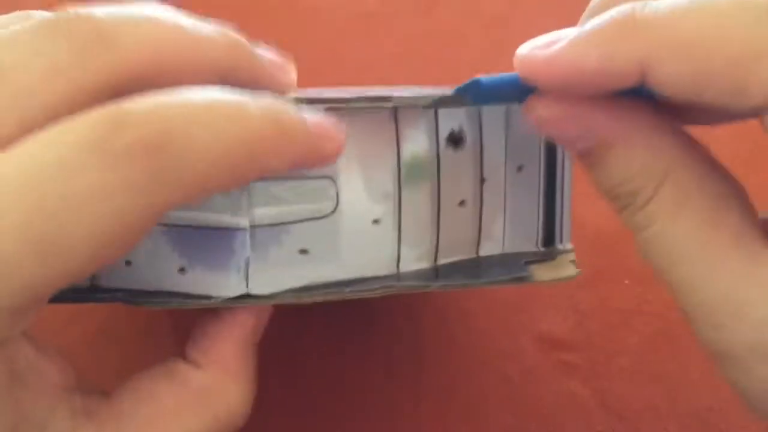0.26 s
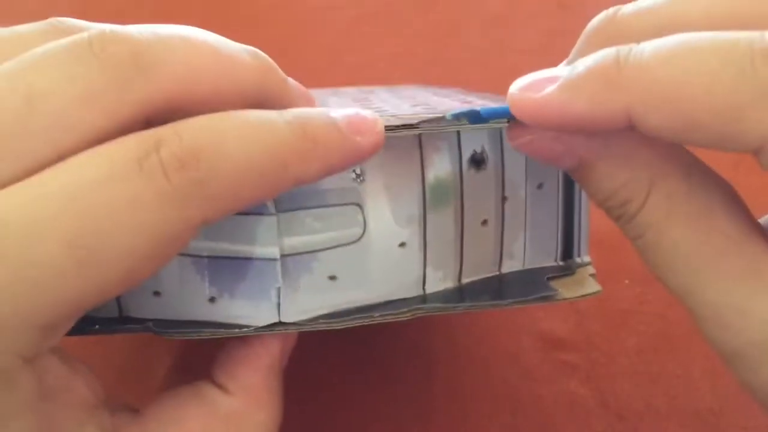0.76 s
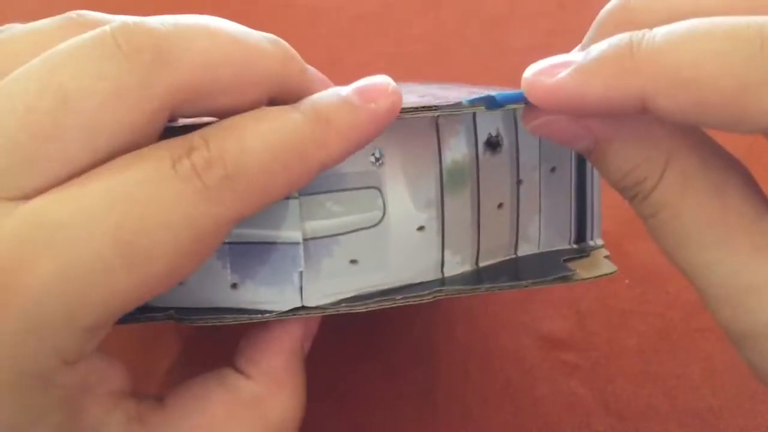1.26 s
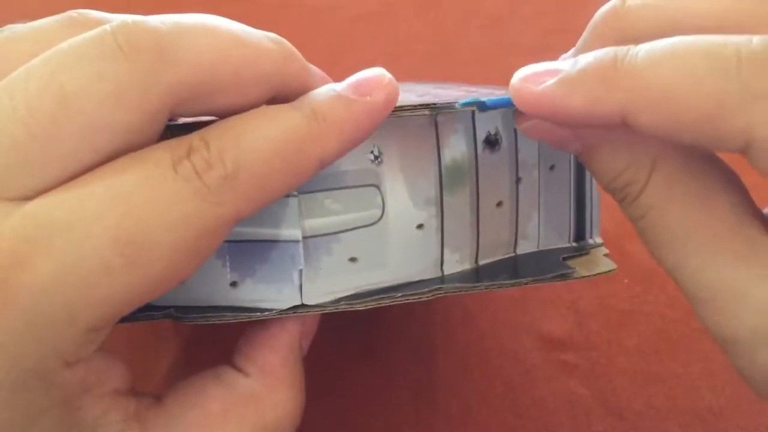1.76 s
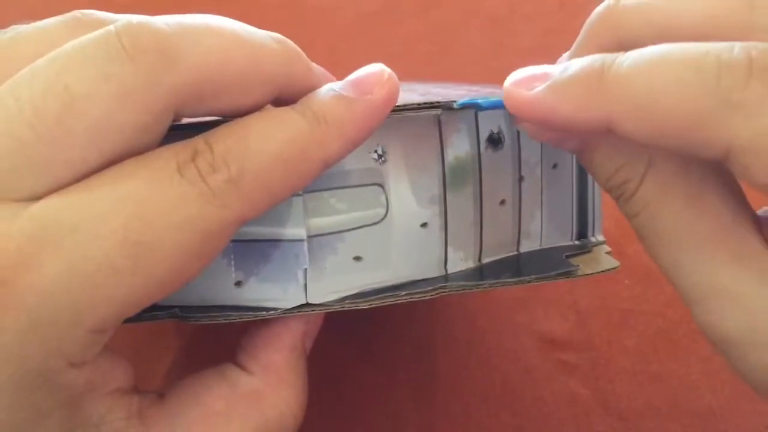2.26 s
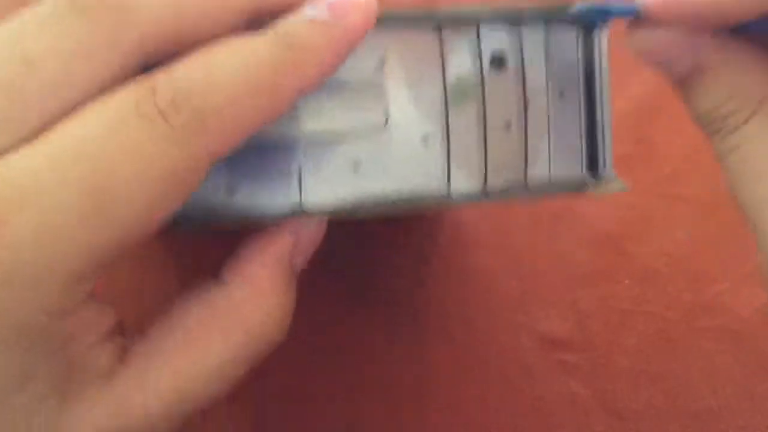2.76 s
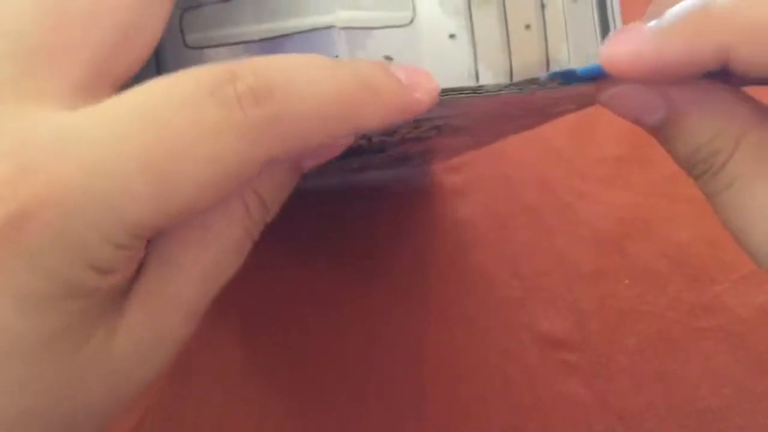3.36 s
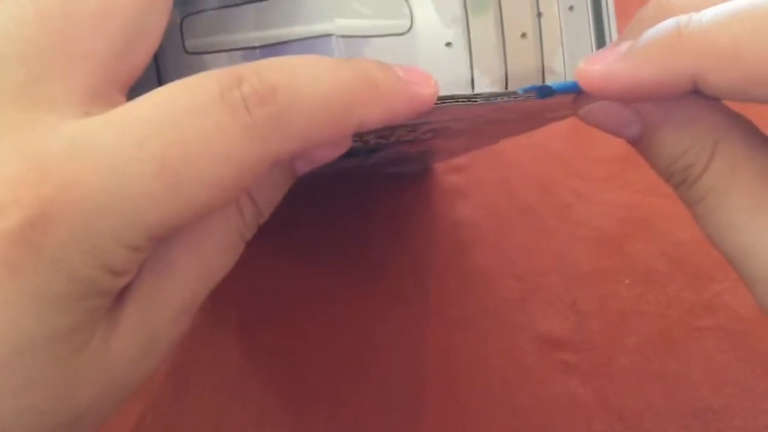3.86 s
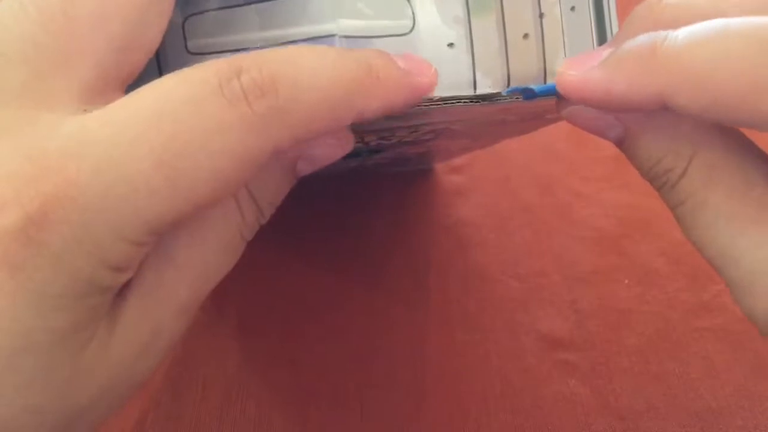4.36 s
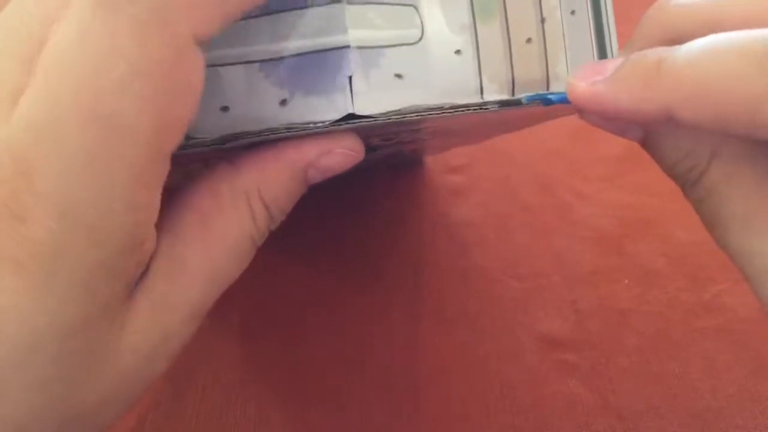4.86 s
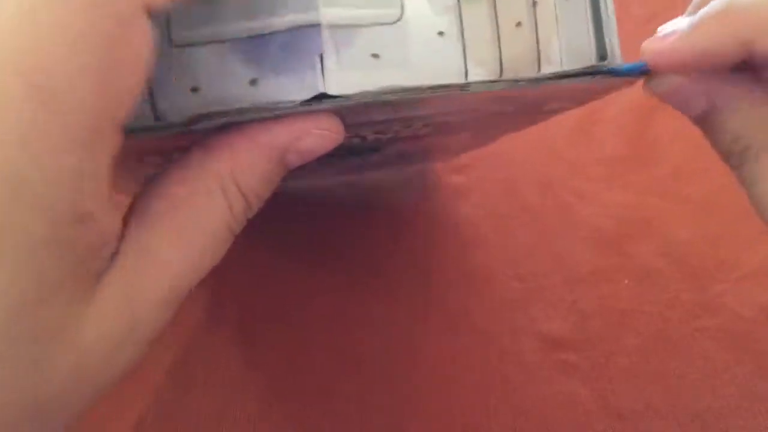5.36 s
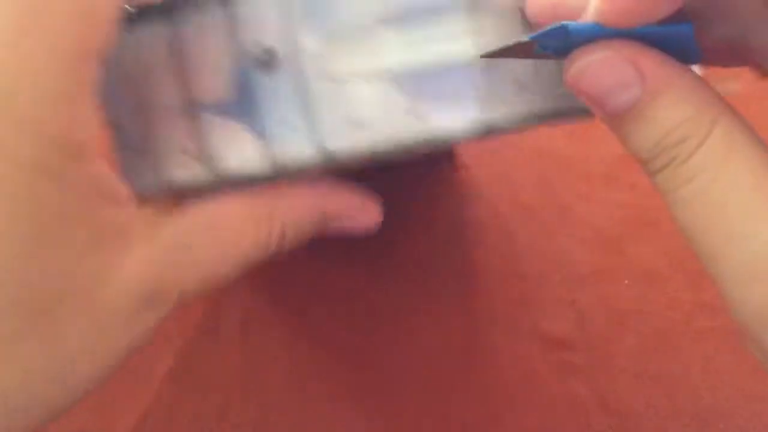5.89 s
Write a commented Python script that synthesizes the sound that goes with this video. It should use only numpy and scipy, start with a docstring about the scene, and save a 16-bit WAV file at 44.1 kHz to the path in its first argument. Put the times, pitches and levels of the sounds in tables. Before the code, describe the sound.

A low, steady appliance hum fills a room throughout. At the start, fingers brush softly on a small cardboard box, very close. Fingernails and a craft knife pick at its tape, giving light crackles and small hollow pops around 0.5 seconds, then again at 1.8 and 2.2 seconds. A sharper snap comes at about 2.5 seconds, followed by a soft slide of fingers and another crackle. Faint, scattered ticks continue from 3 to 5 seconds, with a brief scrape near 4.6. At 5.1 seconds the tape gives with a crisp crackle and pop, followed by rubbing and faint blade squeaks. The loudest snap, with a hollow cardboard pop, lands at about 5.5 seconds. Soft sliding and a few light taps on the box follow around 6 seconds. Each sharp sound has a short, bright room echo.

```python
"""First comes a soft brush of fingers on a small cardboard box, very close by. Then fingernails and a
craft knife pick at its packing tape. Each time the tape gives, threads of glue snap with a crackle and
the cardboard panel springs back with a hollow pop. In between, fingers slide and the blade squeaks.
The ceiling answers with a bright echo, the room rings briefly, and an appliance hums throughout."""
import sys
import numpy as np
from scipy import signal
from scipy.fft import rfft, irfft, next_fast_len
from scipy.io import wavfile
from scipy.ndimage import map_coordinates

SR = 44100
rng = np.random.default_rng(int(sys.argv[2]) if len(sys.argv) > 2 else 0)


def wav_out(sig):
    """Save sig, one row per channel (or a flat mono array), as 16-bit PCM at SR to the path in sys.argv[1]."""
    wavfile.write(sys.argv[1], SR, np.round(np.clip(np.atleast_2d(sig).T, -1, 1) * 32767).astype(np.int16))


N = 270333

# The tape gives and the panel springs back: (time [s], crackle level [dB], tearing time [s],
# treble tilt [dB per octave], tape ring pitch [Hz], pop level [dB], panel swing rate [Hz])
TAPE_TEARS = [(.422, -47, 0.0028, 4.5, 3020, -50.5, 820), (.622, -48.5, 0.0062, -1.5, 3350, -41, 524),
              (1.848, -37, 0.0042, 0, 6260, -40.5, 514), (2.237, -44, 0.016, 3.5, 2470, -49, 720),
              (2.4599, -23.5, 0.0026, 2.5, 2370, -25.5, 424), (2.745, -39.5, .0045, 3.5, 2630, -41, 630),
              (3.065, -45.5, 0.0045, -1, 3240, -51, 600), (3.728, -46, 0.0025, -1.5, 3030, -51, 574),
              (4.319, -52.5, .004, 1, 3580, -52, 600), (4.562, -43.5, 0.0041, 2.5, 2340, -42.5, 676),
              (4.8618, -39.5, 0.0023, -6, 2430, -42, 790), (5.082, -38, 0.0033, 0, 3000, -31, 573),
              (5.0854, -27.5, 0.00653, 3, 2800, -30, 854), (5.4632, -25.5, .002, -2.5, 2600, -30.5, 770),
              (5.466, -20.5, 0.00452, -0.5, 3600, -15, 810), (5.659, -51, 0.0073, 5, 3480, -34.5, 585)]
# A nail flicks the tape, too lightly to move the panel: (time [s], level [dB], tape ring pitch [Hz])
NAIL_FLICKS = [(.47, -43, 3400), (2.233, -43, 3000), (2.883, -42.5, 4460), (3.195, -43.5, 4270),
               (4.114, -47.5, 4850), (5.017, -42, 2830), (5.259, -44, 3420)]
# A fingertip nudges the panel: (time [s], level [dB], panel swing rate [Hz])
PANEL_NUDGES = [(.1135, -41, 363), (4.419, -49, 620), (4.71, -47, 490), (5.423, -47, 785),
                (5.855, -43, 554), (5.909, -42, 446), (5.987, -40, 515), (6.031, -36.5, 430)]
# Fingers and blade slide on the box:
# (peak time [s], rise [s], fall [s], rumble level [dB], rasp compared with rumble [dB])
SLIDE_STROKES = [(.087, .006, 0.089, -50, -10), (2.53, 0.097, 0.1, -49, -16),
                 (2.73, 0.06, 0.041, -44.5, -8.5), (4.561, 0.0067, .028, -47.5, -5.5),
                 (5.11, 0.094, 0.12, -45.5, -14), (5.42, 0.066, .13, -47, -3),
                 (5.663, .014, 0.041, -44.5, -20), (5.93, 0.14, 0.14, -47.5, -28)]
# The blade sticks and slips in the tape: (peak time [s], half length [s], level [dB], pitch [Hz])
BLADE_SQUEAKS = [(0.104, 0.0059, -51.5, 1700), (2.257, .008, -55, 2450), (3.025, .012, -59, 2580),
                 (5.076, 0.0036, -42, 2490), (5.35, .009, -49, 1280), (5.391, 0.037, -49, 1660),
                 (5.786, 0.0044, -56, 2460)]
# Tone of the tape's crackle, coloured by the hollow box: (frequency [Hz], relative level [dB])
CRACKLE_TONE = [(300, -7), (850, 18), (1050, -4), (1300, 8.5), (1900, 1.5), (2600, 2), (6000, -4),
                (8000, -3), (11000, -4.5), (15500, -2.5)]
# Tone of the hollow box, heard in every pop and slide: (frequency [Hz], relative level [dB])
BOX_TONE = [(170, -35.5), (240, -6), (320, 1.5), (490, 5), (570, -1), (630, 3), (710, -2), (860, 2),
            (1030, -9.5), (1220, -2.5), (1550, -15.5), (2300, -16), (5000, -38)]
# Tone of skin hissing over tape: (frequency [Hz], relative level [dB])
HISS_TONE = [(400, -17), (1500, 0), (3000, 3.5), (6000, 1), (10000, 1), (15000, 4.5)]
# How well the taped side points at the ceiling: (time [s], gain [dB])
CEILING_AIM = [(0, 2), (2.5, -6), (4.5, 5), (5.1, 3.5), (5.5, 4), (6.1, -11)]
# Tone of the ceiling's echo: (frequency [Hz], gain [dB])
CEILING_TONE = [(300, -54), (1300, -13.5), (3500, -10.5), (9000, -7.5), (15000, -10)]
# Tone of the room as it starts to ring: (frequency [Hz], relative level [dB])
ROOM_TONE = [(150, -15), (450, -4), (750, -9.5), (1200, -4.5), (2600, 0), (4600, 1), (7000, 1.5),
             (15000, 1)]
# How long the room rings: (frequency [Hz], time to fade by 60 dB [s])
ROOM_FADE = [(200, 1), (700, 0.43), (3000, 0.73), (8000, 0.37), (15000, 0.16)]
# Notes of the appliance's motor: (frequency [Hz], level [dB])
MOTOR_NOTES = [(59.2, -45.5), (138.5, -53.5), (177.3, -53), (203.5, -64), (234.7, -62.5), (339, -68.5),
               (646, -69.5), (829, -67), (1174, -78.5), (10400, -91)]
# Tone of the moving air: (frequency [Hz], relative level [dB])
AIR_TONE = [(15, -74.5), (24, -73), (36, -62.5), (47, -63), (62, -63.5), (82, -77.5), (100, -72),
            (210, -72), (270, -82), (480, -84.5), (820, -90), (1050, -95), (2000, -101), (8000, -104),
            (15500, -104)]


def tape_picking(tear_ring_db=5, flick_ring_db=9, flick_s=0.0029, flick_tilt_db=7.5):
    """Every tear and flick makes the tape crackle. Returns two tracks: the snaps and the ringing."""
    snaps, rings = np.zeros(N), np.zeros(N)
    t = np.arange(SR // 8) / SR
    tears = [(s, db, tear_s, tilt, hz, tear_ring_db) for s, db, tear_s, tilt, hz, _, _ in TAPE_TEARS]
    flicks = [(s, db, flick_s, flick_tilt_db, hz, flick_ring_db) for s, db, hz in NAIL_FLICKS]
    for s, db, tear_s, tilt_db, ring_hz, ring_db in tears + flicks:
        snap, ring = amp(db) * crackle(t, tear_s, tilt_db, ring_hz, ring_db)
        add(snaps, s, snap)
        add(rings, s, ring)
    return snaps, rings


def crackle(t, tear_s, tilt_db, ring_hz, ring_db, ring_width=0.27, late_db=-19, late_fade_s=0.26):
    """Glue threads snap in a burst that rings the tight tape; a few snap late. Rows: (snaps, ring)."""
    progress = t / tear_s
    shape = progress * np.exp(-2 * progress ** 2)
    burst = grains(len(t), spread_db=0) * shape / shape.max()
    late_shape = amp(late_db - 60 * t / late_fade_s) * np.minimum(progress, 1)
    late_snaps = grains(len(t), spread_db=7.5) * late_shape
    ring = amp(ring_db) * filtered(burst, lambda f: resonance(f, ring_hz, ring_width * ring_hz))
    tone = lambda f: along(CRACKLE_TONE, f) + tilt_db * np.log2(np.clip(f, 3000, 12000) / 3000)
    parts = np.array([coloured(burst + late_snaps, tone), coloured(ring, tone)])
    energy = np.sum(parts.sum(axis=0) ** 2)
    return parts * np.sqrt(tear_s * SR / energy)


def panel_pops(lag_s=0.0013, lag_share=0.678):
    """The cardboard pops at each nudge, and after each tear: a short lag plus part of the tearing time."""
    out = np.zeros(N)
    t = np.arange(-SR // 100, SR // 10) / SR
    releases = [(s + lag_s + lag_share * tear_s, db, hz) for s, _, tear_s, _, _, db, hz in TAPE_TEARS]
    for s, db, swing_hz in releases + PANEL_NUDGES:
        add(out, s + t[0], amp(db) * pop(t, swing_hz))
    return out


def pop(t, swing_hz, rise_cycles=0.77, fall_cycles=0.077, energy_s=0.0097):
    """The panel swings out and back around t = 0, and the box makes that push sound hollow."""
    cycles = t * swing_hz
    shape = np.exp(-np.abs(cycles) / np.where(cycles < 0, rise_cycles, fall_cycles))
    swing = shape * np.sin(2 * np.pi * cycles)
    sound = coloured(swing, lambda f: along(BOX_TONE, f))
    return sound * np.sqrt(energy_s * SR / np.sum(sound ** 2))


def slides(hiss_db=-5.5, rasp_hz=1310, flutter_db=2.0):
    """Skin and blade drag unevenly: the box rumbles, tape hisses, a firm grip rasps, the blade squeaks."""
    out = np.zeros(N)
    rumble = unit(coloured(grains(N, spread_db=2.5), lambda f: along(BOX_TONE, f)))
    hiss = unit(coloured(grains(N, spread_db=3.5), lambda f: along(HISS_TONE, f)))
    grip = rasp(rasp_hz, width=0.37)
    for s, rise, fall, db, grip_db in SLIDE_STROKES:
        rubbing = rumble + amp(hiss_db) * hiss + amp(grip_db) * grip
        out += amp(db) * swell(s, rise, fall) * rubbing
    for s, half_length, db, hz in BLADE_SQUEAKS:
        out += amp(db) * swell(s, half_length, half_length) * rasp(hz, width=0.14)
    return out * amp(flutter_db * wobble(110))


def rasp(hz, width):
    """Uneven slipping makes noise around one pitch; width is a share of that pitch."""
    return unit(filtered(rng.standard_normal(N), lambda f: resonance(f, hz, width * hz) ** 2))


def ceiling_echo(x, delay_s=0.014, scatter_s=0.00071, scatter_db=-2):
    """One bright, slightly scattered echo, strongest when the taped side points up."""
    lag = np.arange(SR // 100) / SR
    scatter = rng.standard_normal(len(lag)) * np.exp(-lag / scatter_s)
    clean_bounce = lag == 0
    bounce = clean_bounce + amp(scatter_db) * scatter / np.linalg.norm(scatter)
    aim_db = np.interp(np.arange(N) / SR, *np.transpose(CEILING_AIM))
    upward = coloured(x * amp(aim_db), lambda f: along(CEILING_TONE, f))
    echo = np.zeros(N)
    add(echo, delay_s, signal.fftconvolve(upward, bounce / np.linalg.norm(bounce)))
    return echo


def room_ring(x, tail_db=-9, build_s=0.0013):
    """Many echoes blur into a tail in which each frequency fades at its own speed."""
    hz, t, noise = signal.stft(rng.standard_normal(SR * 3 // 4), SR, nperseg=256)
    level_db = along(ROOM_TONE, hz)[:, None] - 60 * t / along(ROOM_FADE, hz)[:, None]
    _, tail = signal.istft(noise * amp(level_db), SR, nperseg=256)
    tail *= 1 - np.exp(-np.arange(len(tail)) / SR / build_s)
    return amp(tail_db) * signal.fftconvolve(x, tail / np.linalg.norm(tail))[:N]


def appliance(air_db=-45.5, drift_radians=0.38, waver_db=1.73):
    """A motor hums several slightly unsteady notes over the rush of moving air."""
    t = np.arange(N) / SR
    hum = np.zeros(N)
    for hz, db in MOTOR_NOTES:
        peak = np.sqrt(2) * amp(db + waver_db * wobble(4.97))
        hum += peak * np.sin(2 * np.pi * hz * t + drift_radians * wobble(5.4))
    air = unit(filtered(rng.standard_normal(N), lambda f: amp(along(AIR_TONE, f))))
    return hum + amp(air_db) * air


def grains(size, spread_db):
    """Noise of many tiny slips; a larger spread makes a few of them stand out."""
    return unit(rng.standard_normal(size) * amp(spread_db * rng.standard_normal(size)))


def swell(s, rise, fall):
    """Bell-shaped loudness curve of a stroke that peaks at time s."""
    t = np.arange(N) / SR - s
    return np.exp(-(t / np.where(t < 0, rise, fall)) ** 2)


def wobble(rate):
    """A smooth curve through random points, `rate` of them each second."""
    points = rng.standard_normal(int(N * rate / SR) + 4)
    return map_coordinates(points, [np.arange(N) * rate / SR])


def resonance(f, hz, width_hz):
    """How something that rings at hz responds to frequency f; 1 at its own pitch."""
    return 1j * f * width_hz / (hz * hz - f * f + 1j * f * width_hz)


def filtered(x, response):
    """Multiply each frequency in x by response(frequency)."""
    size = next_fast_len(len(x) + 8192)
    hz = np.fft.rfftfreq(size, 1 / SR)
    return irfft(rfft(x, size) * response(hz), size)[:len(x)]


def coloured(x, gain_db, size=2048):
    """Change the tone of x by gain_db(frequency)."""
    hz = np.fft.rfftfreq(size, 1 / SR)
    cepstrum = irfft(np.log(amp(gain_db(hz))))
    # Fold the second half onto the first, so the filter rings only after a sound, never before.
    cepstrum[1:size // 2] *= 2
    cepstrum[size // 2 + 1:] = 0
    click_response = irfft(np.exp(rfft(cepstrum)))
    return signal.fftconvolve(x, click_response)[:len(x)]


def along(table, hz):
    """Read between the rows of a (frequency, value) table, with octaves evenly spaced."""
    frequencies, values = np.transpose(table)
    return np.interp(np.log(hz + 1), np.log(frequencies), values)


def add(track, s, sound):
    """Mix a sound into the track at time s."""
    start = max(round(s * SR), 0)
    stretch = track[start:start + len(sound)]
    stretch += sound[:len(stretch)]


def amp(db):
    """Turn decibels into a multiplier."""
    return 10 ** (np.asarray(db) / 20)


def unit(x):
    """Scale to an average strength (rms) of 1."""
    return x / np.sqrt(np.mean(x ** 2) + 1e-20)


def scene(ring_up_db=-2):
    """Box, echoes and hum in one channel; the tape beams its ring at the listener and the ceiling."""
    snaps, rings = tape_picking()
    box = snaps + panel_pops() + slides()
    echo = ceiling_echo(box + amp(ring_up_db) * rings)
    return (box + rings + echo + room_ring(box) + appliance())[None]


def record(dry):
    """Cut away the very highest treble."""
    top_hz = 15900
    return np.array([filtered(channel, lambda f: f < top_hz) for channel in dry])


dry = scene()
out = record(dry)
wav_out(out)
```